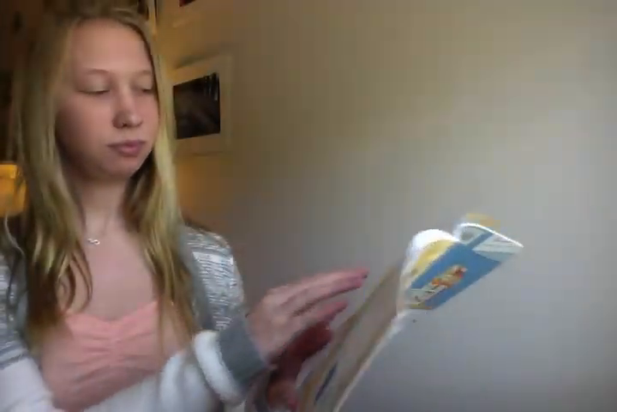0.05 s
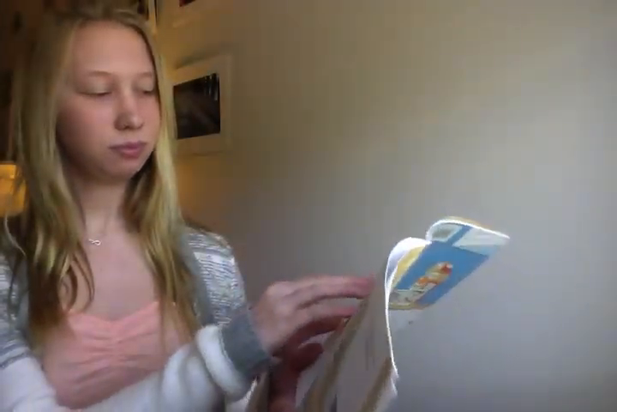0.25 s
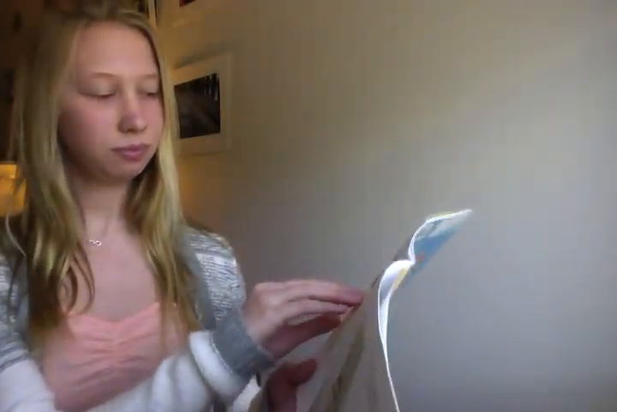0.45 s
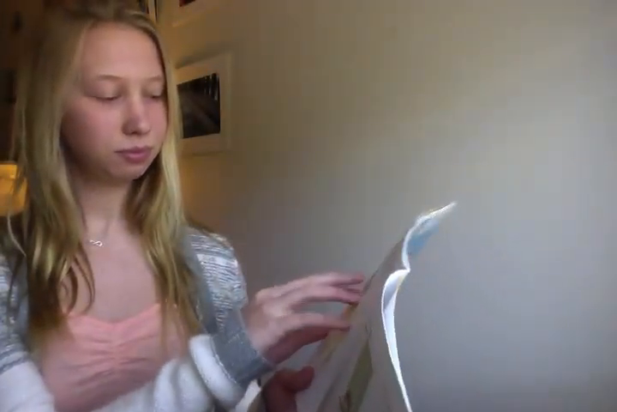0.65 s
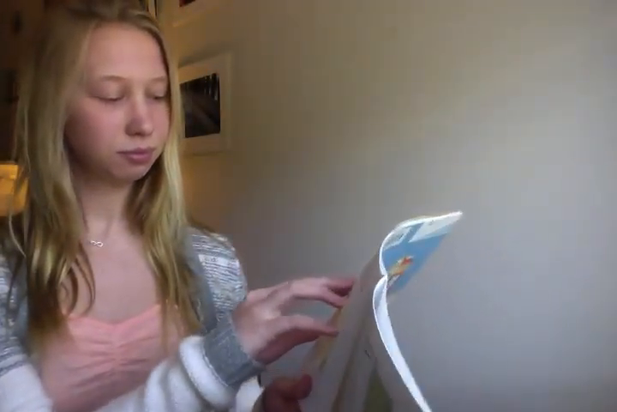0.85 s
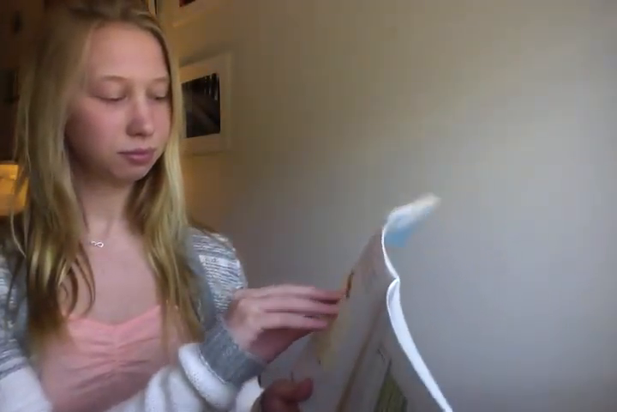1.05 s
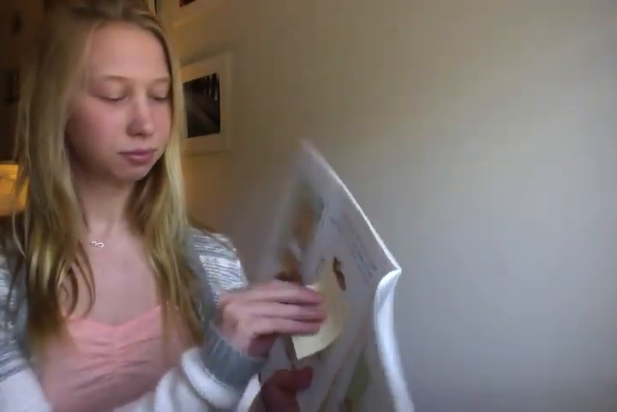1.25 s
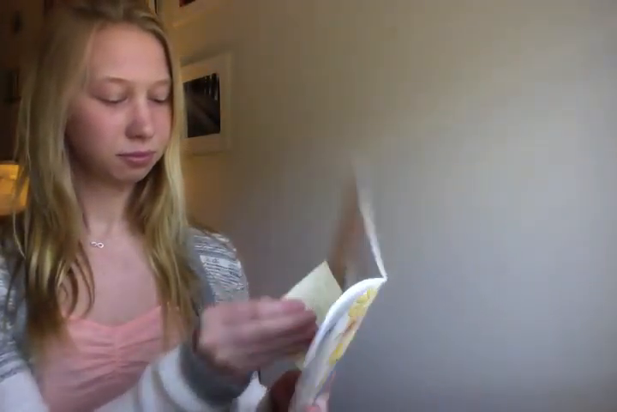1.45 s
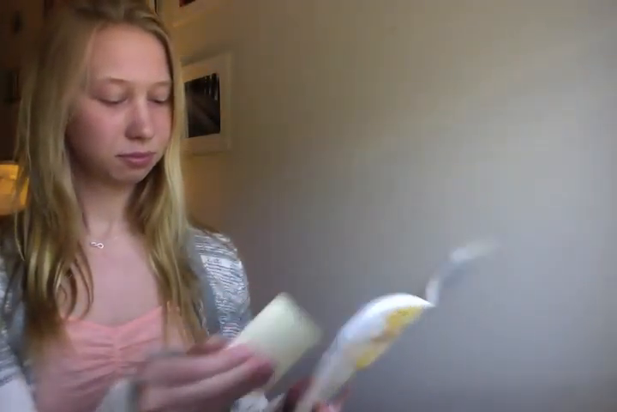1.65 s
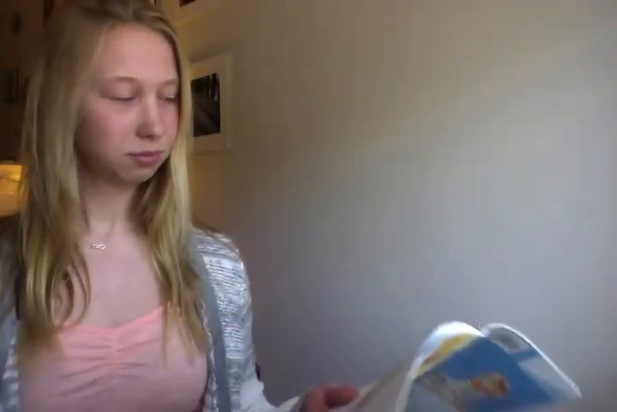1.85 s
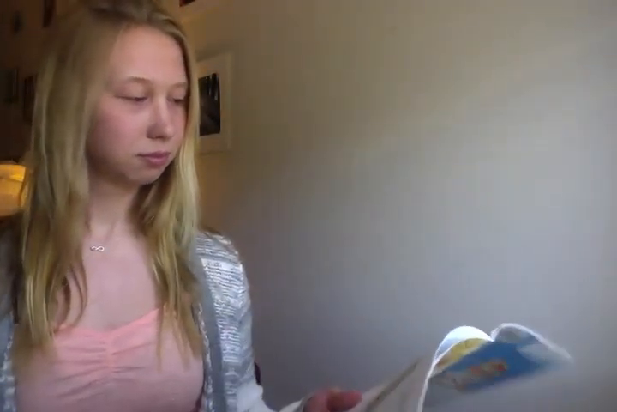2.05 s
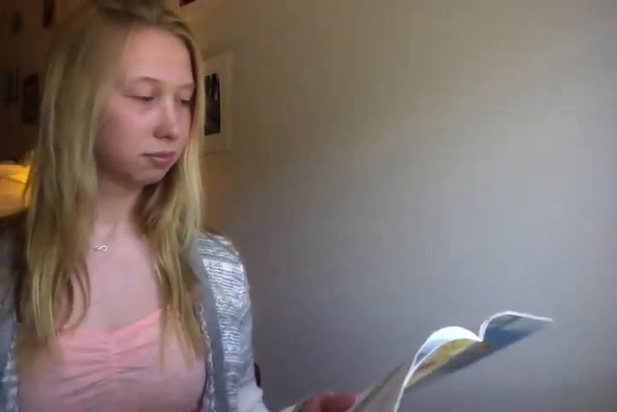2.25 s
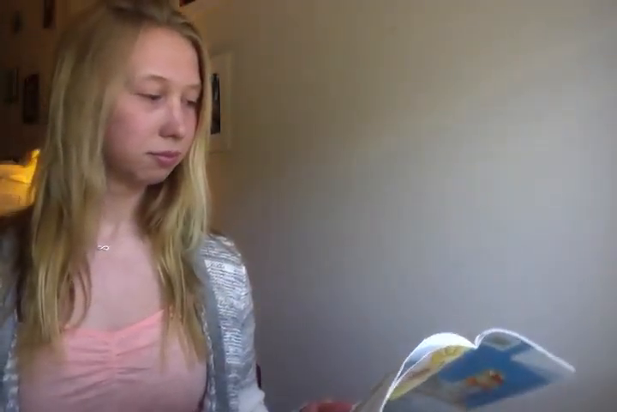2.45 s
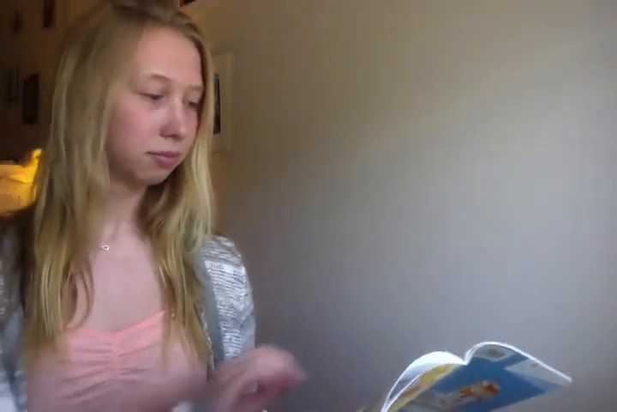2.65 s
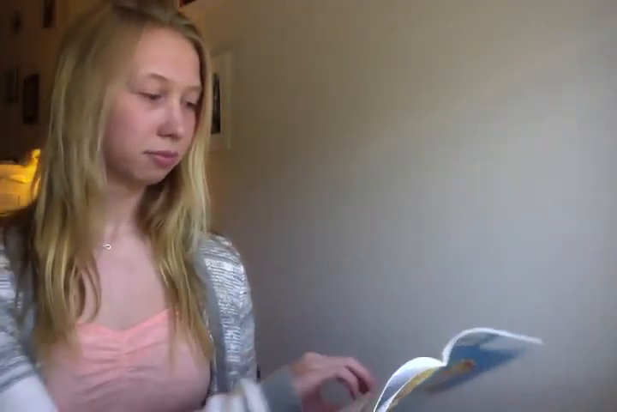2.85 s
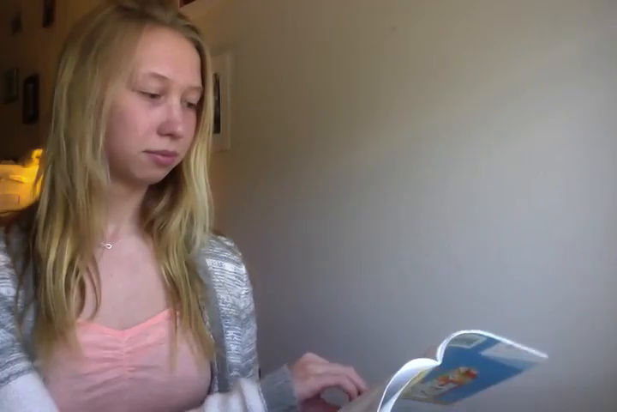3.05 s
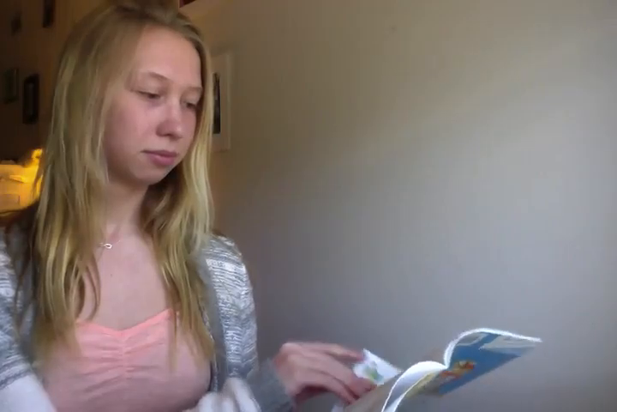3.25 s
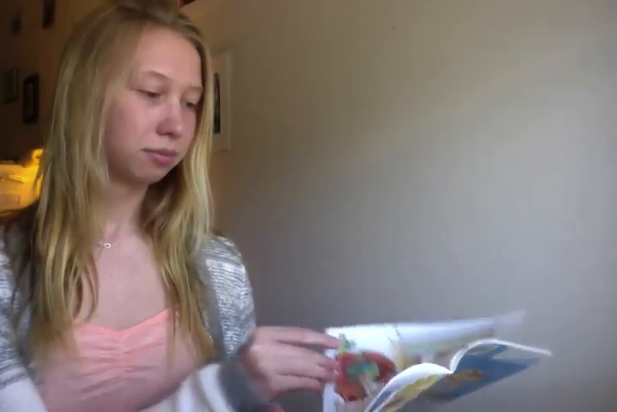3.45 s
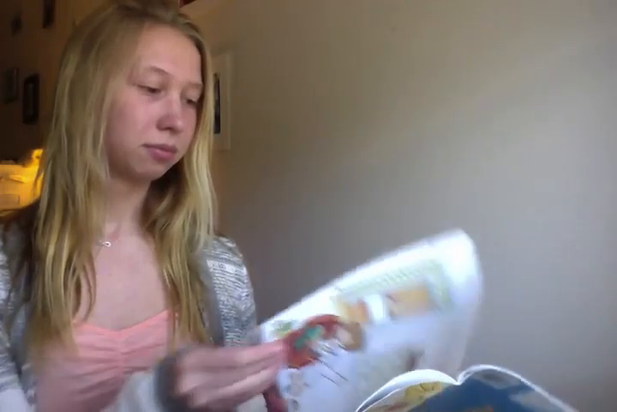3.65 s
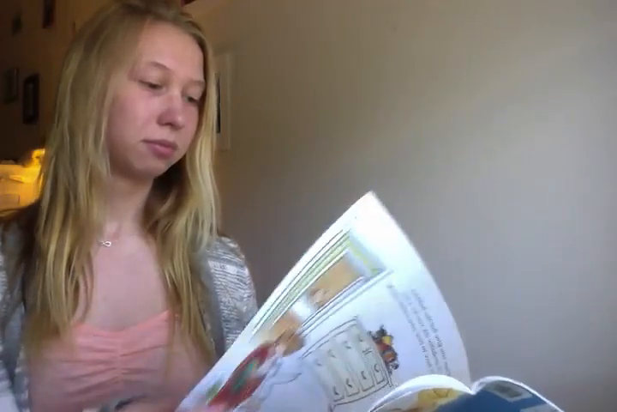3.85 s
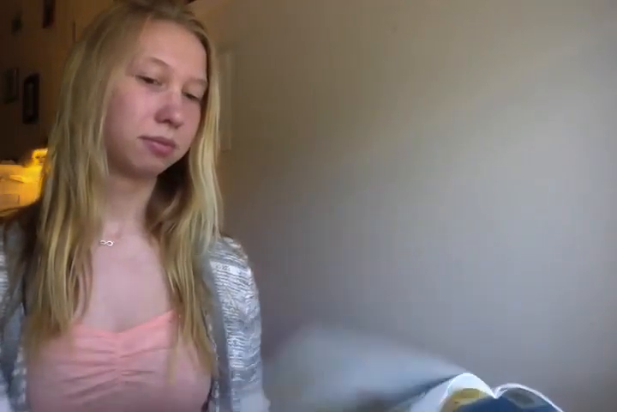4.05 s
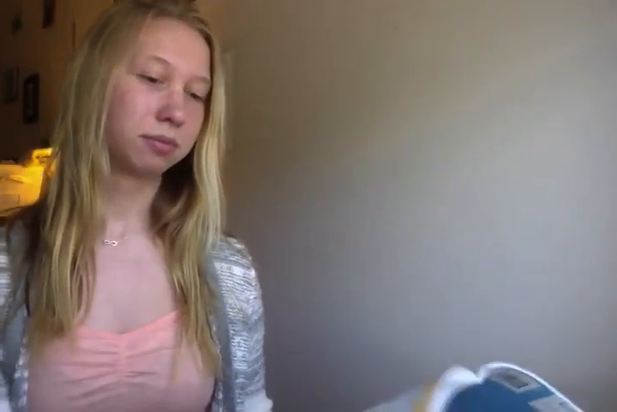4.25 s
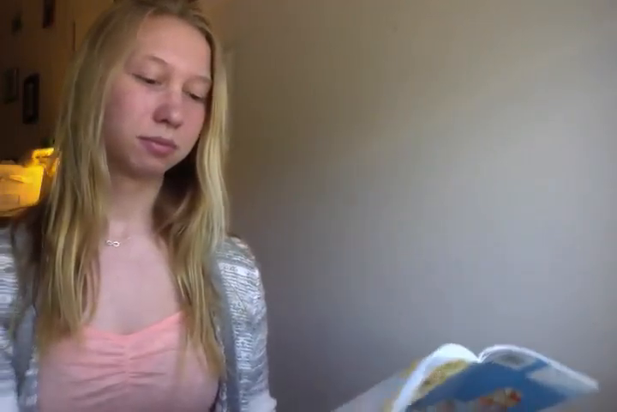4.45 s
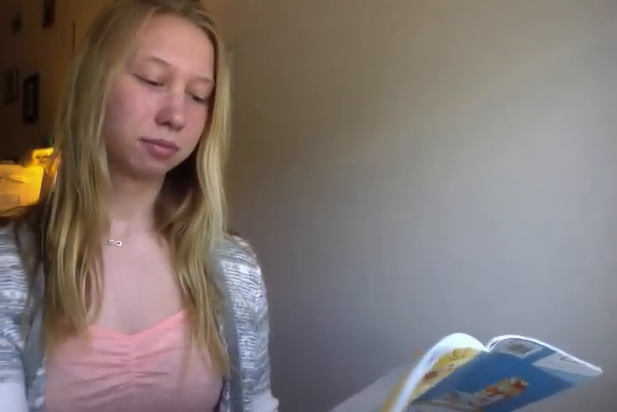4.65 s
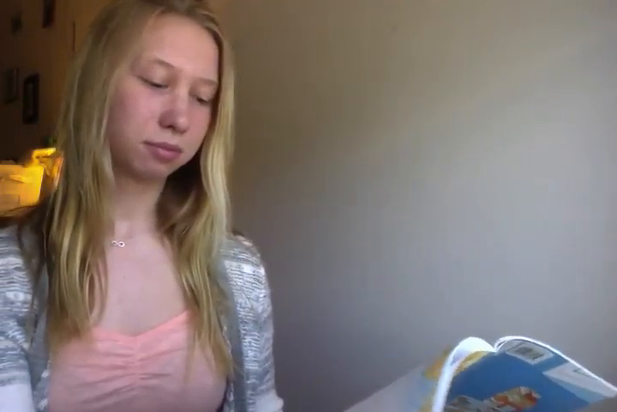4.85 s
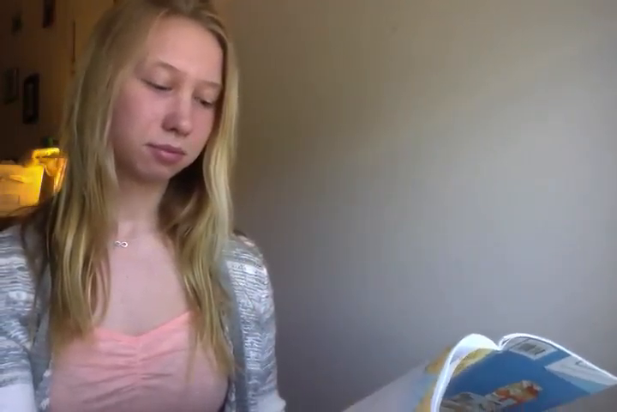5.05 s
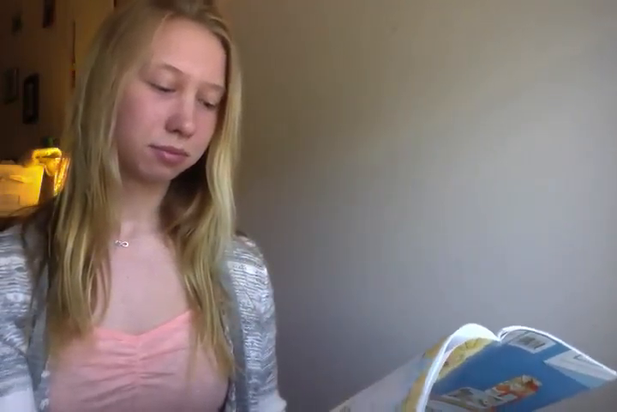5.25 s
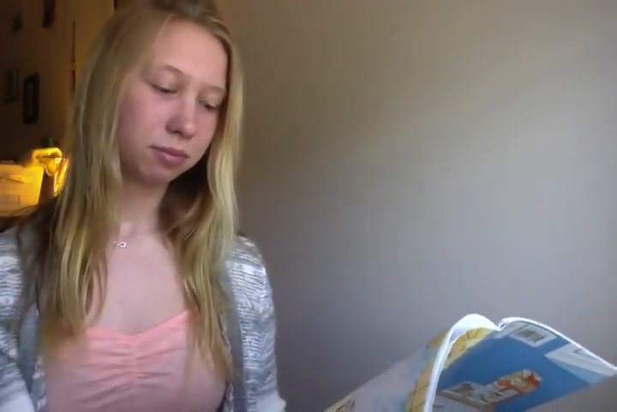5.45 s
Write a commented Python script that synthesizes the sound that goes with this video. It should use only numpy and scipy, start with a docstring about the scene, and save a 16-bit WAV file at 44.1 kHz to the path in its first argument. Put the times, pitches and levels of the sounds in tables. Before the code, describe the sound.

A thin paperback is handled close to a small microphone in a quiet room, with short reflections from nearby walls and a very faint appliance hum. The first second holds only slight paper brushes and ticks, ending in a soft bump. At about 1.2 seconds a stiff page buckles with a sharp, crinkling crack, the loudest sound. From 1.3 to 1.7 seconds sheets slide over each other with a grainy hiss and several more snaps. Between 2.2 and 2.6 seconds the book flops gently in the hands, with dull bumps and light crinkles. After a lull, fingers brush and tick on paper from 3.2 seconds. Another page turns more softly, with a crisp tick at 3.6, a flap near 3.8, another tick at 4.1 and a short swish at 4.3. From about 4.6 seconds the book is still and the hum fades away.

```python
"""Leafing through a paperback

A thin paperback is handled close to a small microphone in a quiet room. Stiff sheets buckle
with snaps and slide over each other with a grainy hiss as their fibres catch and slip; the limp
book bumps softly in the hands. The near walls answer each sound, and an appliance hums faintly."""
import sys
import numpy as np
from scipy import signal
from scipy.fft import rfft, irfft
from scipy.io import wavfile

SR = 44100
rng = np.random.default_rng(int(sys.argv[2]) if len(sys.argv) > 2 else 0)


def digitize_waveform(pressure):
    """Quantize a signal to 16-bit integers and store it at the path in sys.argv[1].

    Rows of a 2-D input are taken as channels; values are limited to [-1, 1].
    """
    field = np.atleast_2d(pressure).T
    bounded = np.clip(field, -1, 1)
    quanta = np.round(bounded * 32767).astype(np.int16)
    wavfile.write(sys.argv[1], SR, quanta)


N = 243146
TIME = np.arange(N) / SR
FREQS = np.fft.rfftfreq(4096, 1 / SR) + 1  # grid for the filter curves [Hz]


def amp(db):
    """Decibels to gain."""
    return 10 ** (np.asarray(db) / 20)


def unit(x):
    """Scales to rms 1."""
    return x / np.sqrt(np.mean(abs(x) ** 2) + 1e-30)


def curve_at(points, hz):
    """Joins points by straight lines on a log-frequency axis."""
    point_hz, value = np.transpose(points)
    return np.interp(np.log(hz + 1), np.log(point_hz), value)


def add(mix, start_s, sound):
    """Mixes a sound in at its start time."""
    part = mix[max(round(start_s * SR), 0):][:len(sound)]
    part += sound[:len(part)]


def colour(x, gain):
    """Causal (minimum-phase) filter shaped like the gain curve on FREQS, its peak at 0 dB."""
    log_gain = np.log(np.maximum(gain / gain.max(), 1e-5))
    mirrored = np.concatenate([log_gain, log_gain[-2:0:-1]])
    impulse_response = np.fft.ifft(np.exp(signal.hilbert(mirrored).conj())).real
    return signal.fftconvolve(x, impulse_response)


def drift(rate_hz):
    """A smooth random wobble, complex, of rms 1."""
    noise = rng.standard_normal(N) + 1j * rng.standard_normal(N)
    return unit(np.fft.ifft(noise * np.exp(-(np.fft.fftfreq(N, 1 / SR) / rate_hz) ** 2)))


def hit_at_level(sound, db):
    """Gives a short sound the energy of 10 ms at this level."""
    return amp(db) * sound * np.sqrt(SR / 100 / np.sum(sound ** 2))


# Spectrum of the room tone: (frequency [Hz], relative level [dB])
ROOM_TONE_EQ = [(15, -71.5), (25, -41), (108, -10), (137, -10), (166, -1.5), (200, -9.5), (344, -19.5),
                (427, -17), (503, -23.5), (591, -18.5), (1100, -19), (1290, -20.5), (4610, -34.5),
                (12500, -44), (16000, -63.5)]


def room_tone(shelf_db=1.5, shelf_hz=1500):
    """Soft, low room noise with a slight treble lift."""
    hz = np.fft.rfftfreq(N, 1 / SR)
    air = unit(irfft(rfft(rng.standard_normal(N)) * amp(curve_at(ROOM_TONE_EQ, hz)), N))
    treble = irfft(rfft(air) * hz ** 2 / (hz ** 2 + shelf_hz ** 2), N)
    return air + (amp(shelf_db) - 1) * treble


# The appliance's tones: (pitch [Hz], level within the background [dB], waver rate [Hz])
HUM_TONES = [(117, -8.5, 11), (170.9, -4.5, 8), (1084, -13.5, 24)]


def appliance_hum():
    """An appliance hums on a few tones, each wavering in level and phase."""
    return sum(amp(db) * unit(((1 + drift(waver_hz)) * np.exp(2j * np.pi * hz * TIME)).real)
               for hz, db, waver_hz in HUM_TONES)


def background(level_db=-64, fade_from_s=4.57, fade_db_per_s=10.5):
    """The bed of room tone and hum; near the end the whole background fades away."""
    db = level_db - fade_db_per_s * np.maximum(TIME - fade_from_s, 0)
    return amp(db) * (amp(-1) * room_tone() + appliance_hum())


def near_echoes(x, level_db=-5, first_s=.002, spread_s=.012, patterns=4, changes_per_s=8):
    """Echoes off the reader and the near wall; the book keeps moving, so their patterns crossfade."""
    position, out = TIME * changes_per_s, np.zeros(N)
    for k in range(patterns):
        distance = abs((position - k + patterns / 2) % patterns - patterns / 2)
        send = x * np.cos(np.pi / 2 * np.minimum(distance, 1))
        delays = first_s + spread_s * (np.arange(10) + rng.random(10)) / 10
        gains = rng.choice([-1, 1], 10) * np.exp(-delays / spread_s)
        for delay, gain in zip(delays, gains / np.linalg.norm(gains)):
            add(out, delay, amp(level_db) * gain * send)
    return out


# Reverb decay, with a slight ring near 3 kHz: (frequency [Hz], time to fall 60 dB [s])
REVERB_TIMES = [(200, 0.43), (530, 0.21), (1400, 0.29), (2800, 0.21), (3300, 0.29), (3900, 0.26),
                (9700, 0.13), (16000, 0.18)]


def room_tail(x, level_db=-9, predelay_s=0.0076, frame=256):
    """The room stores the energy of each band and lets it die away as diffuse noise."""
    hop = frame // 4
    framing = dict(fs=SR, nperseg=frame, noverlap=frame - hop)
    hz, _, bands = signal.stft(x, **framing)
    retained = amp(-120 * hop / SR / curve_at(REVERB_TIMES, hz))  # share of energy left after a hop
    stored = np.array([signal.lfilter([1 - r], [1, -r], abs(band) ** 2)
                       for r, band in zip(retained, bands)])
    noise = unit(signal.stft(rng.standard_normal(N), **framing)[2])
    out = np.zeros(N)
    add(out, predelay_s, signal.istft(noise * np.sqrt(stored), **framing)[1])
    return amp(level_db) * out


def panel(hz, q):
    """A sheet radiates poorly below its resonance and evenly above it."""
    ratio = FREQS / hz
    return ratio ** 2 / abs(1 - ratio ** 2 + 1j * ratio / q)


# The microphone's tone colour on the snaps and slides: (frequency [Hz], gain [dB])
CLOSE_MIC_EQ = [(400, 1.5), (800, 0.5), (1150, -4.5), (2200, 2), (2800, -1.5), (3400, 1), (4500, 0),
                (5200, -1), (6600, -2.5), (8200, -3), (10200, 1), (12500, -2), (15500, -7.5)]


def sheet_response(hz, q, slope_db, edge_hz, modes_db=3.0, spacing_hz=170):
    """A close-miked sheet: tilted above resonance, dulled by soft contact, with new modes each bend."""
    rolloff = 1 / np.hypot(1, (FREQS / edge_hz) ** 4)
    modes = np.interp(FREQS / spacing_hz, np.arange(len(FREQS)), rng.standard_normal(len(FREQS)))
    ripple_db = modes_db * modes * np.minimum(FREQS / 2000, 1)
    tilt_db = slope_db * np.log2(np.hypot(1, FREQS / hz))
    return panel(hz, q) * rolloff * amp(tilt_db + curve_at(CLOSE_MIC_EQ, FREQS) + ripple_db)


# The limp book flops in the hands: (time [s], level [dB], pitch [Hz], decay time [s])
BUMP_CUES = [(0.257, -66, 340, 0.0084), (0.9938, -36.5, 229, 0.0026), (1.026, -43.5, 319, .012),
             (1.295, -46.5, 242, 0.0027), (1.344, -53, 327, 0.015), (1.379, -44.5, 173, .008),
             (2.064, -56, 330, .01), (2.194, -57, 396, 0.024), (2.245, -38.5, 217, 0.023),
             (2.331, -47.5, 320, .04), (2.428, -55.5, 334, 0.013), (2.559, -44, 356, 0.018),
             (3.77, -51, 218, 0.006), (4.095, -51, 427, 0.033)]


def book_bumps(q=1.2, rolloff_order=3.5, low_cut_hz=110):
    """The whole block of pages is pushed, and flaps for a few dull cycles."""
    out, t = np.zeros(N), np.arange(4096) / SR
    push = unit(1. * (t == 0))
    low_cut = FREQS ** 2 / (FREQS ** 2 + low_cut_hz ** 2)
    for start, db, hz, decay_s in BUMP_CUES:
        flutter = unit(rng.standard_normal(len(t)) * np.exp(-t / decay_s))
        body = panel(hz, q) / (1 + (FREQS / hz) ** rolloff_order) * low_cut
        add(out, start, hit_at_level(colour(push + flutter, body), db))
    return out


# A fingertip squeaks on glossy paper: (centre [Hz], half width [Hz], full boost [dB])
SQUEAK_BANDS = [(5000, 230, 5), (9500, 790, 3.5)]
# Ways paper slides, by motion:
# (tilt [dB/octave], treble edge [Hz], pressure peak [share of stroke], pressure at the ends [dB])
SLIDE_MOTIONS = {"sweep": (0.55, 14006, 0.83, -11), "brush": (-3, 13000, 0.73, -16),
                 "drag": (-2.5, 12800, 0.41, -11), "swish": (-15, 11000, 0.58, -10)}
# The cue at 2.582 s is a faint swell of background hiss, as when a recorder's gain shifts;
# in all the rest, paper slides on paper or under a finger:
# (time [s], length [s], level [dB], panel pitch [Hz], motion)
SLIDE_CUES = [(0.275, .15, -66.5, 2280, "brush"), (0.433, .085, -60.5, 1290, "brush"),
              (.517, .095, -50.8, 1600, "drag"), (1.072, 0.12, -51, 2940, "brush"),
              (1.4, 0.093, -34.5, 510, "sweep"), (1.404, 0.2, -46, 1850, "swish"),
              (1.473, 0.086, -36.5, 550, "sweep"), (1.562, 0.064, -33, 550, "sweep"),
              (1.614, .036, -39, 1600, "swish"), (2.189, 0.017, -40.5, 1750, "swish"),
              (2.215, 0.023, -41, 1400, "drag"), (2.225, .045, -40, 600, "sweep"),
              (2.272, .04, -49, 1080, "drag"), (2.311, .048, -43.5, 3800, "drag"),
              (2.343, 0.086, -51.5, 3850, "drag"), (2.582, 0.35, -69.5, 2614, "swish"),
              (2.932, 0.011, -51, 4400, "sweep"), (3.242, 0.052, -55.5, 2030, "drag"),
              (3.305, .08, -45.5, 1400, "brush"), (3.372, .078, -46, 1300, "drag"),
              (3.789, 0.044, -39, 854, "swish"), (3.969, .19, -48, 1700, "brush"),
              (4.034, 0.088, -49.5, 2650, "swish"), (4.128, 0.12, -58, 794, "drag"),
              (4.15, .09, -55, 500, "swish"), (4.255, .018, -50.5, 1244, "swish"),
              (4.268, 0.054, -38, 3620, "swish"), (4.27, 0.061, -51, 4000, "drag"),
              (4.339, 0.057, -50, 1760, "swish"), (4.396, 0.21, -66, 2760, "swish")]


def page_slides(slips_per_s=650, slip_spread_db=2.6, judder_db=1.8, judder_hz=110,
                q=1.1, release_s=0.0082, firm_db=-46):
    """Fibres catch and slip: countless tiny ones hiss, larger ones tick, and the sheet judders."""
    slips = (rng.random(N) < slips_per_s / SR) * rng.choice([-1, 1], N)
    slip_sizes = amp(slip_spread_db * np.minimum(rng.exponential(1, N), 4))
    fibres = rng.standard_normal(N) + .85 * unit(slips * slip_sizes)
    friction = fibres * amp(judder_db * unit(drift(judder_hz).real))
    squeak_db = sum(db * np.exp(-((FREQS - hz) / width) ** 2) for hz, width, db in SQUEAK_BANDS)
    out = np.zeros(N)
    for start, length, db, hz, motion in SLIDE_CUES:
        slope_db, edge_hz, peak_share, ends_db = SLIDE_MOTIONS[motion]
        touching = (TIME >= start) & (TIME < start + length + release_s)
        t, peak_s = TIME[touching] - start, length * peak_share
        lightness = np.clip((firm_db - db) / 10, 0, 1)  # only light strokes squeak
        tone = sheet_response(hz, q, slope_db, edge_hz) * amp(lightness * squeak_db)
        rub = unit(colour(friction[touching], tone)[:len(t)])
        pressure = amp(np.interp(t, [0, peak_s, length], [ends_db, 0, ends_db]))
        attack = t / (1 / SR + .13 * peak_s)  # a slow stroke also lands slowly
        release = (length - t) / release_s + 1
        contact = np.clip(np.minimum(attack, release), 0, 1)
        add(out, start, amp(db) * rub * pressure * contact)
    return out


# Ways a sheet gives way, by contact, from sharp to soft:
# (tilt [dB/octave], treble edge [Hz], crumple time [s], panel Q)
SNAP_CONTACTS = {"crack": (2.5, 13300, .0013, 1.7), "crinkle": (-1.5, 9200, .0065, 1.7),
                 "tick": (-7.5, 8200, .0012, 1.8), "flap": (-3, 2900, .006, 1.7),
                 "pat": (-16, 4000, .001, 3)}
# A sheet buckles or is tapped: (time [s], level [dB], panel pitch [Hz], contact)
SNAP_CUES = [(.034, -62, 920, "pat"), (.539, -52.5, 1410, "tick"), (.874, -62.5, 765, "tick"),
             (0.9872, -46.5, 1500, "flap"), (0.9889, -36.5, 630, "pat"), (1.135, -53, 680, "crinkle"),
             (1.206, -43, 2700, "tick"), (1.2138, -19.5, 880, "crack"), (1.2191, -25, 2800, "crinkle"),
             (1.3436, -33.5, 970, "tick"), (1.344, -40.5, 706, "crack"), (1.350, -29.5, 3900, "tick"),
             (1.3961, -38, 1360, "flap"), (1.4845, -32, 800, "crack"), (1.6151, -30, 526, "crack"),
             (1.713, -46.5, 1300, "pat"), (2.1992, -45, 3270, "tick"), (2.245, -37.5, 600, "crinkle"),
             (2.326, -41, 5200, "crinkle"), (2.553, -45.5, 390, "crinkle"), (2.561, -39.5, 420, "crinkle"),
             (3.168, -50.5, 2400, "pat"), (3.175, -42.5, 2220, "tick"), (3.339, -42, 850, "tick"),
             (3.375, -47, 800, "tick"), (3.4098, -48.5, 750, "tick"), (3.435, -46, 945, "tick"),
             (3.5998, -32, 797, "tick"), (3.714, -55.5, 806, "pat"), (3.7405, -49.5, 1400, "pat"),
             (3.758, -41, 740, "pat"), (3.769, -33, 720, "flap"), (3.775, -31.5, 900, "flap"),
             (3.91, -43, 692, "pat"), (3.9405, -51, 690, "pat"), (4.096, -34, 2450, "tick"),
             (4.103, -41.5, 1090, "crinkle")]


def page_snaps(burst_gain=0.93, spikiness=1.6, shiver_db=-3, shiver_s=0.0062):
    """A stiff sheet gives way with one crack, a quick burst of smaller ones, and a short shiver."""
    out, t = np.zeros(N), np.arange(4096) / SR
    for start, db, hz, contact in SNAP_CUES:
        slope_db, edge_hz, crumple_s, q = SNAP_CONTACTS[contact]
        burst_noise, shiver_noise = rng.standard_normal((2, len(t)))
        crack = unit(1. * (t == 0)) / (1 + crumple_s / .0015)  # weaker when the crumple is slow
        spikes = np.sign(burst_noise) * abs(burst_noise) ** spikiness
        burst = unit(spikes * np.exp(-t / crumple_s))
        shiver = unit(shiver_noise * np.exp(-t / shiver_s))
        force = crack + burst_gain * burst + amp(shiver_db) * shiver
        snap = colour(force, sheet_response(hz, q, slope_db, edge_hz))
        add(out, start, hit_at_level(snap, db))
    return out


def scene():
    """The book up close, with its echoes and a short tail, over the background; mono."""
    book = page_snaps() + book_bumps() + page_slides()
    return (book + near_echoes(book) + room_tail(book) + background())[None]


def record(dry, low_cut_hz=60.3, high_cut_hz=15900):
    """A small microphone with little deep bass, then a steep cut of the highest treble."""
    thin = signal.sosfilt(signal.butter(1, low_cut_hz, "high", fs=SR, output="sos"), dry)
    high_cut = signal.firwin(401, high_cut_hz, window=("kaiser", 8), fs=SR)
    return signal.oaconvolve(thin, high_cut[None], "same")


dry = scene()
out = record(dry)
digitize_waveform(out)
```